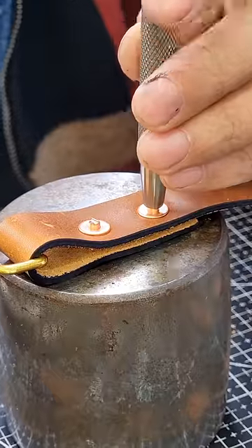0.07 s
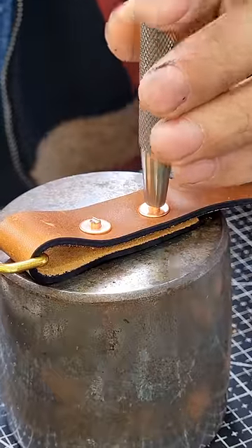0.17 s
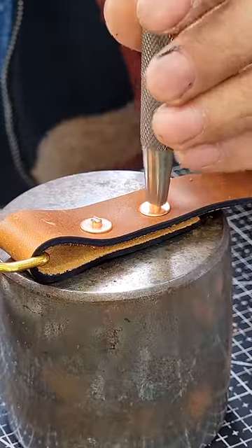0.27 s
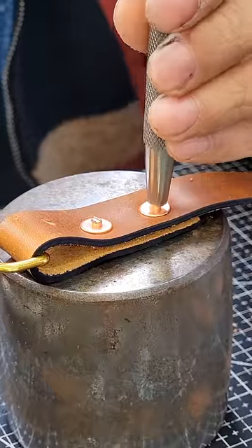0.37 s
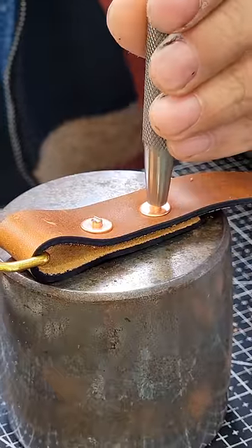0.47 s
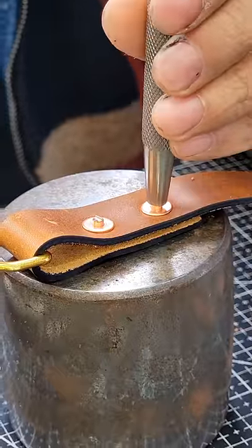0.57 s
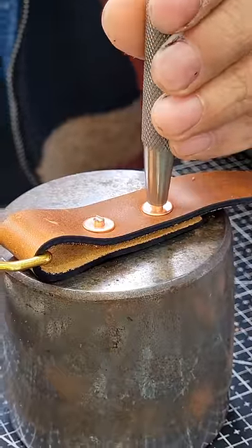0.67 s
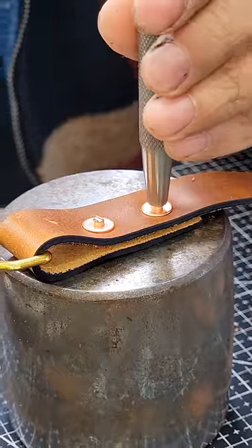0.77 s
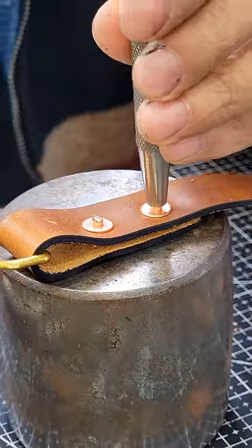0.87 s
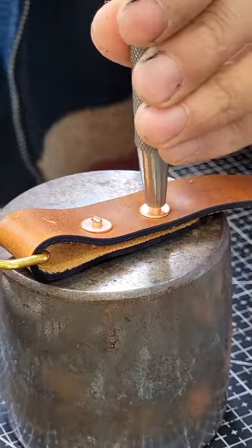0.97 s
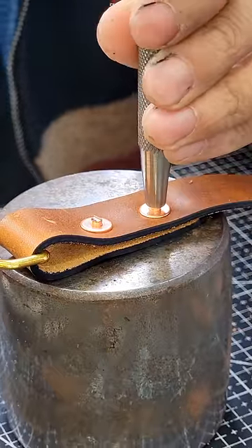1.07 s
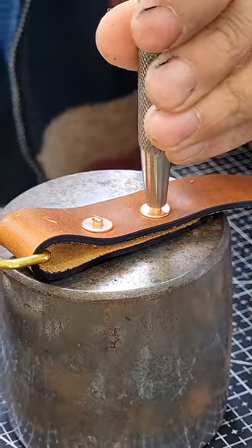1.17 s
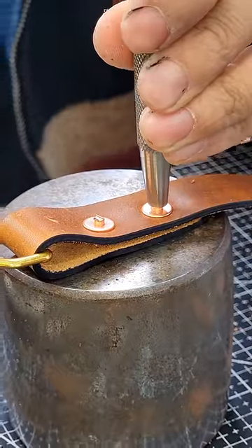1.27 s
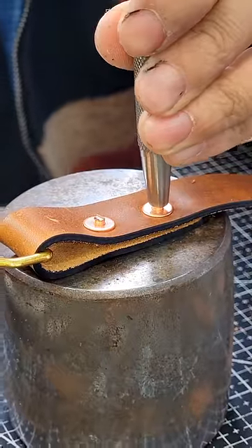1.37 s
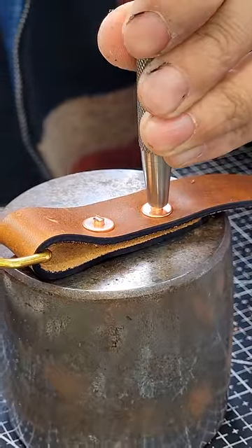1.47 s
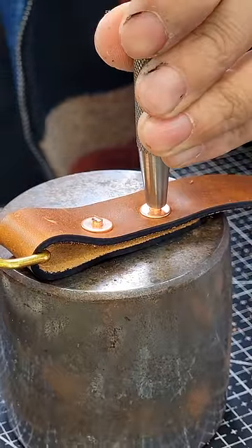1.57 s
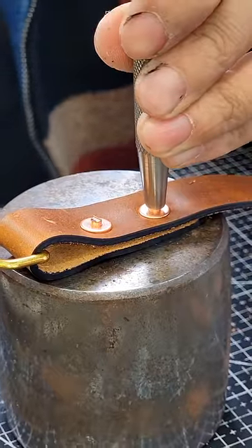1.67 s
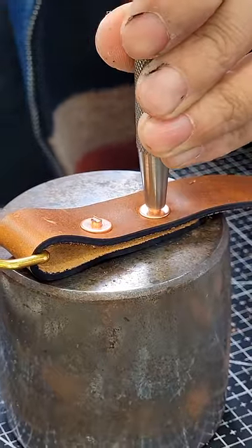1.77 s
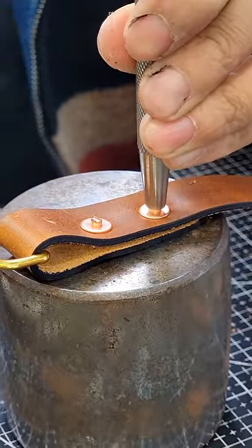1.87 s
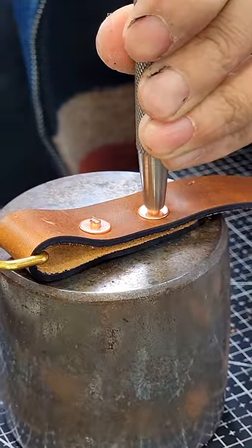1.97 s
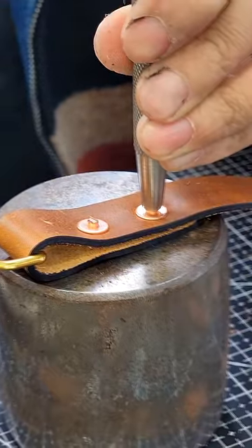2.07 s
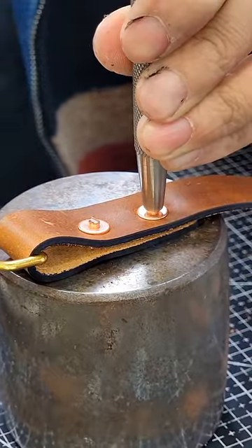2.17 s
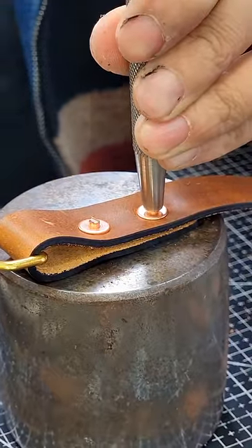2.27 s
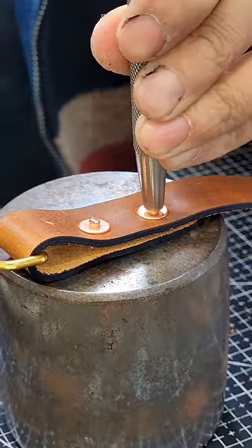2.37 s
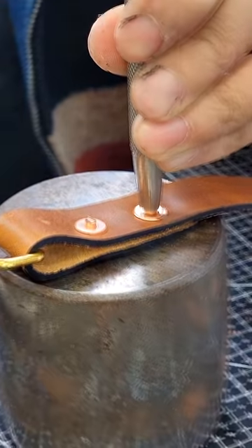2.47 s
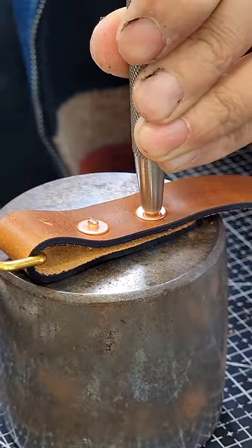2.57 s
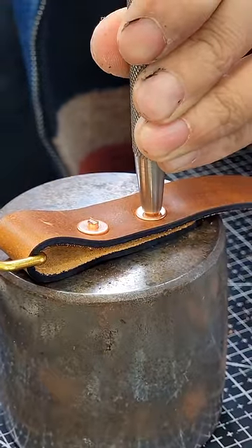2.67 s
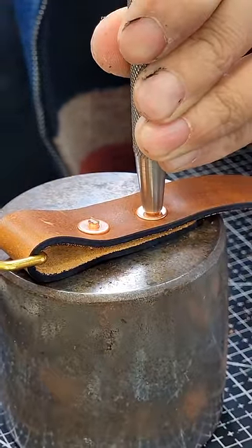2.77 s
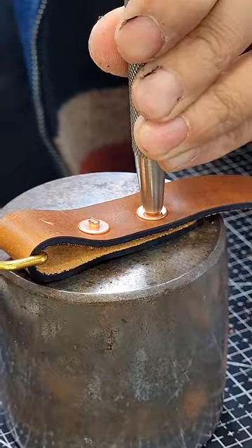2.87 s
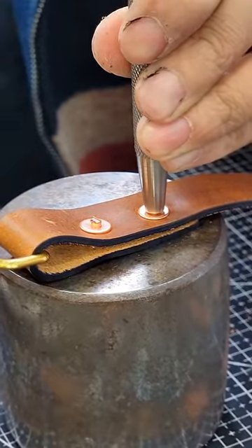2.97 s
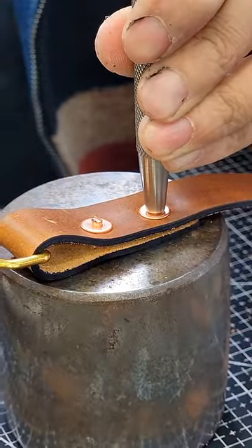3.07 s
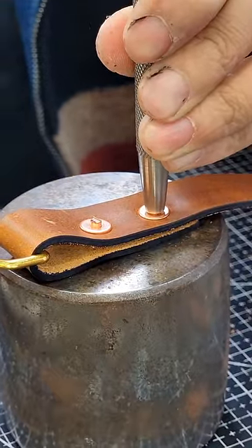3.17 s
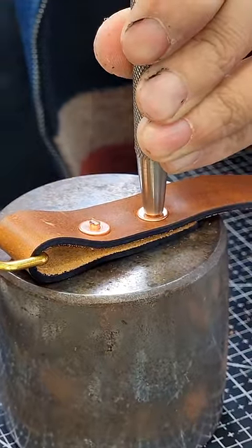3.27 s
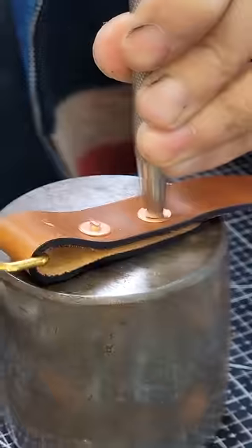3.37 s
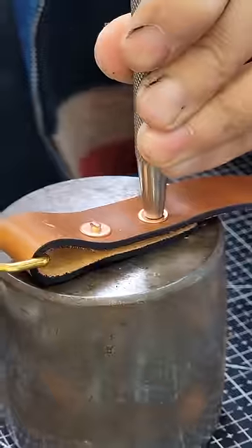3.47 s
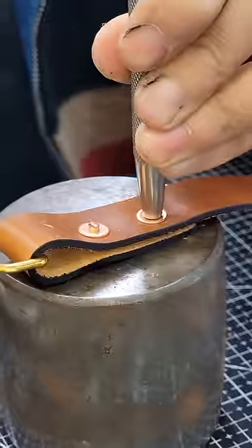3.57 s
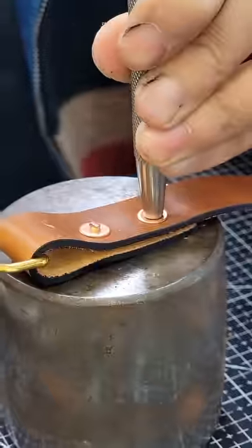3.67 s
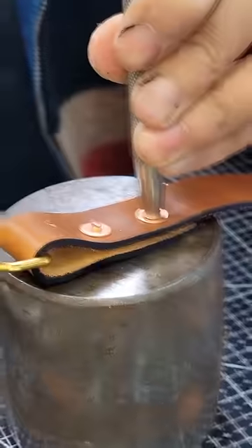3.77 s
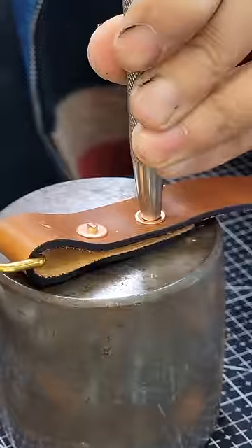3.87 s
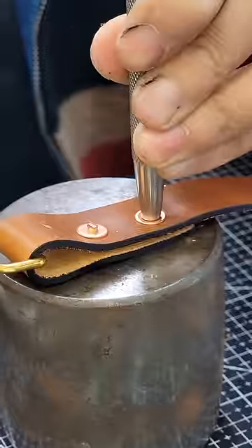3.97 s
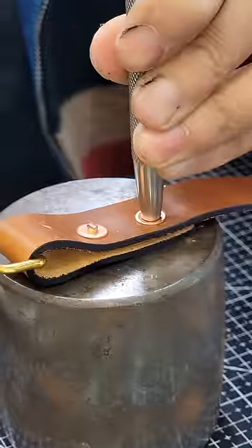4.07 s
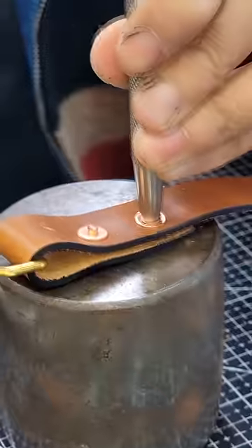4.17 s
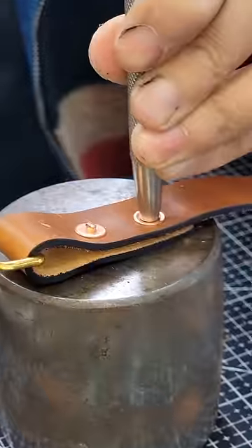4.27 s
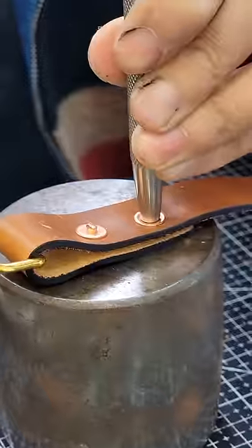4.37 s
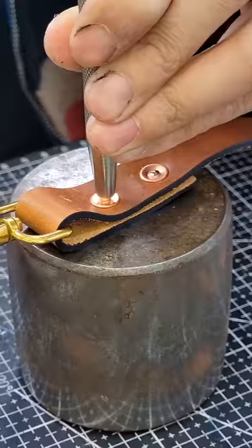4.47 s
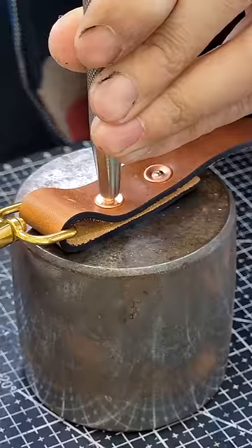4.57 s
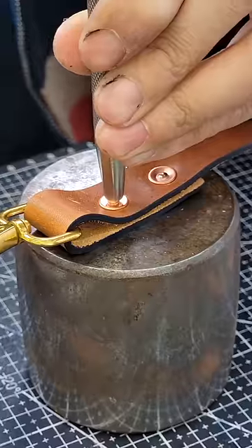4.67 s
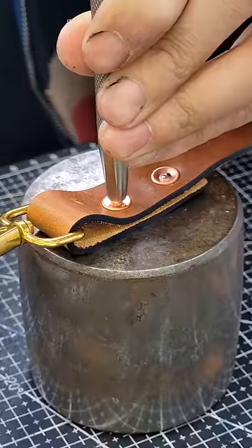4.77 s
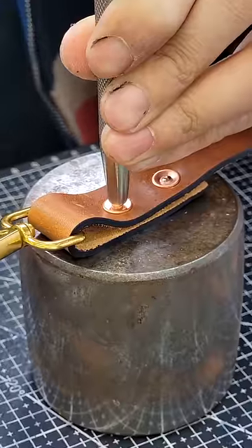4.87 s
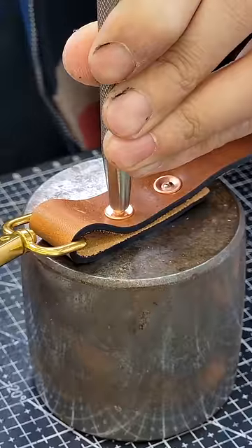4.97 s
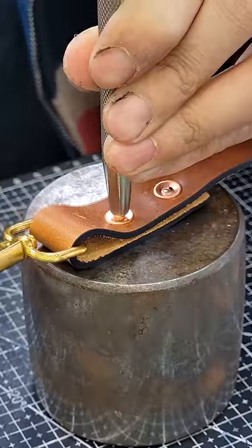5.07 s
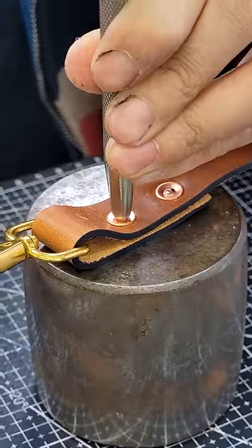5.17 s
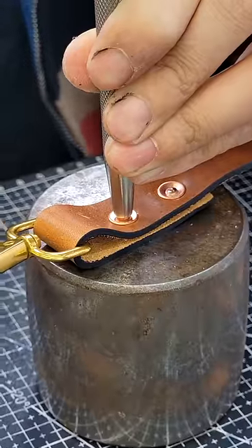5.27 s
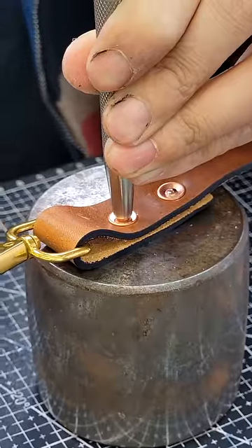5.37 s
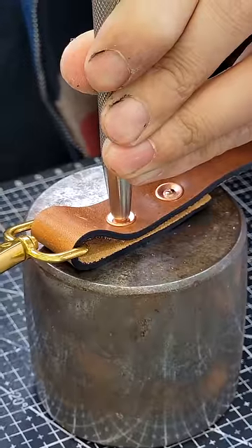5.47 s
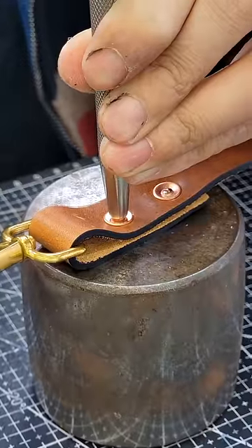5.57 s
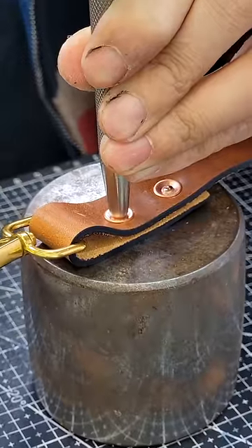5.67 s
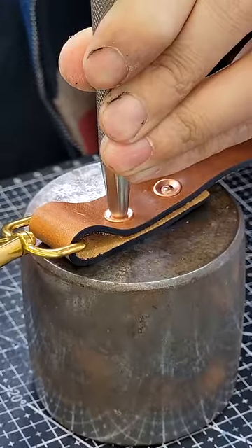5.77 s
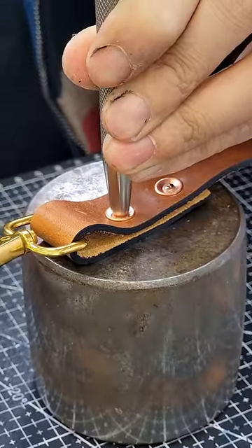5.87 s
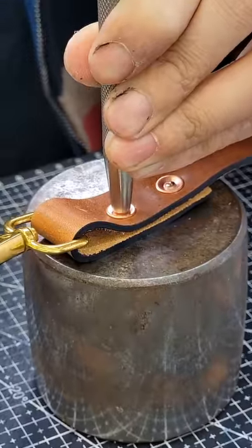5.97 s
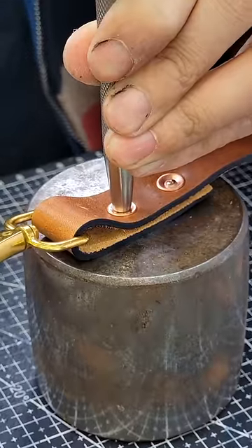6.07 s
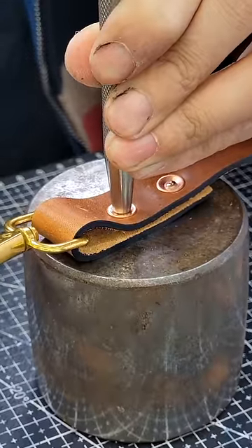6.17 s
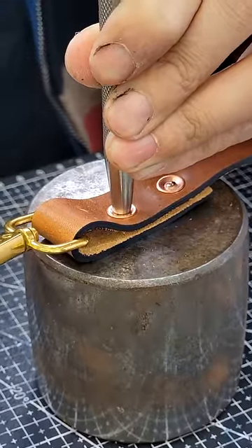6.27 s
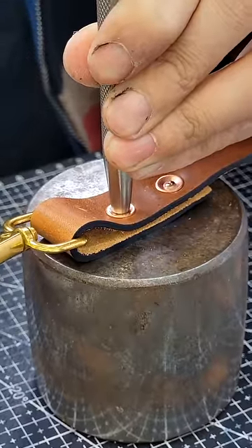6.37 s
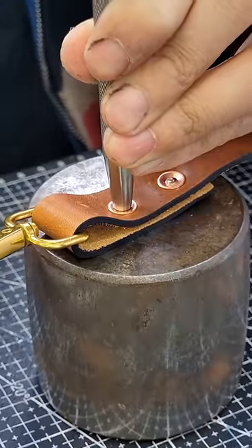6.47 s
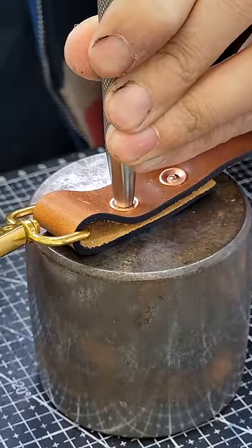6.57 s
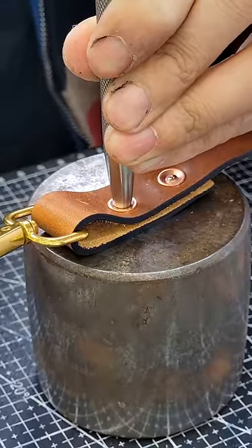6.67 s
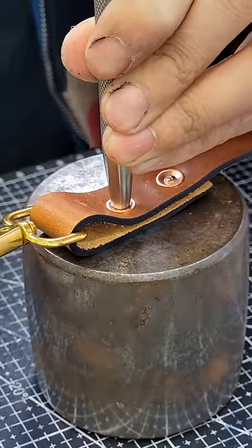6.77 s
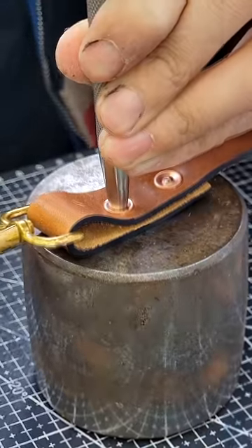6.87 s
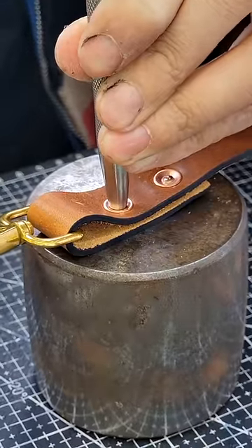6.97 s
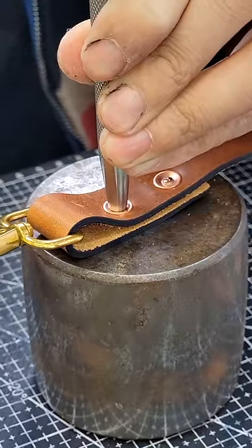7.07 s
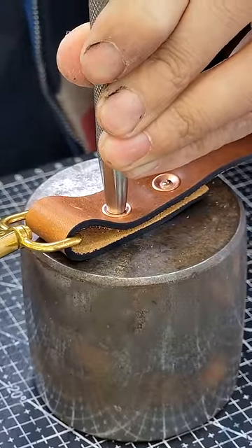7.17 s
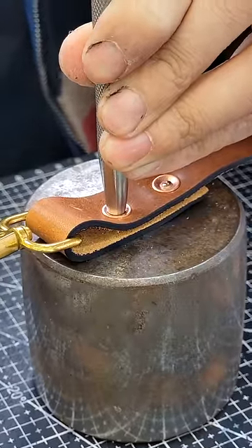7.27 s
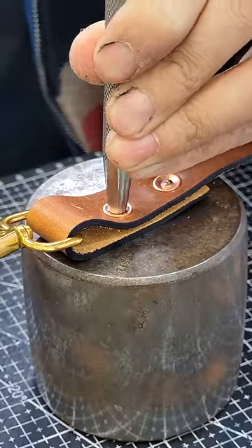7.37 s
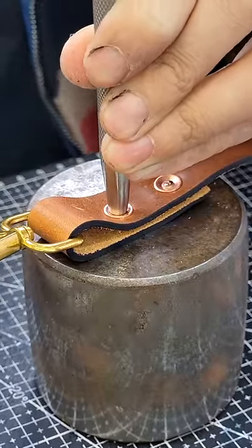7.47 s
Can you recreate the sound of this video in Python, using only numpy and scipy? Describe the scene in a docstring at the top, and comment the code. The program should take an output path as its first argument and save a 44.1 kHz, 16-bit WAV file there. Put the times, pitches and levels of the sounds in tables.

```python
"""A small, quiet workshop: a hammer drives a steel punch onto copper rivets in a leather strap, over a
steel block on the bench. The first blow on each rivet sinks into soft copper with a dull thud and a
bright click; as the copper hardens, later blows land hard and knock the bench. The punch pings when
struck and ticks and squeaks faintly when handled; after one blow the hammer rebounds with light ticks.
The room answers over a low rumble and hiss, and a fast limiter holds the peaks."""
import sys
import numpy as np
from scipy import signal
from scipy.fft import rfft, irfft, next_fast_len
from scipy.io import wavfile
from scipy.ndimage import uniform_filter1d, minimum_filter1d, map_coordinates

SR = 44100
rng = np.random.default_rng(int(sys.argv[2]) if len(sys.argv) > 2 else 0)


def pcm_store(signal):
    """Save signal as 16-bit PCM."""
    levels = np.round(np.clip(np.atleast_2d(signal), -1, 1) * 32767)
    wavfile.write(sys.argv[1], SR, levels.astype(np.int16).T)


N = 331191
LEAD = round(.06 * SR)  # pre-roll before a contact, in samples
T = np.arange(-LEAD, SR) / SR  # time around one contact, s


# hammer blows: t/s, force/dB, click trim/dB, ping f/Hz, ping level/dB
BLOWS = [(1.6991, 0.5, -21.5, 4150, -36), (2.1465, -0.5, -29, 14640, -37), (2.5458, .5, -36.5, 7020, -38),
         (3.0098, 0.04, -43, 9940, -46), (3.4321, -1.56, -45.5, 12340, -47), (3.851, -4, -27, 12050, -35.5),
         (4.295, 0.5, -35.5, 12640, -41.5), (4.7525, -1, -20.5, 7610, -37), (5.183, -.5, -30, 6940, -28),
         (5.684, 0, -48, 7900, -42.5), (6.1144, -.5, -42.5, 8130, -49.5), (6.53, 0, -35.5, 4760, -46.5),
         (6.9702, 0, -30, 4760, -36.5)]
# stereo lean of the blows: f/Hz, left minus right/dB
PAN_CURVE = [(60, -1), (250, -2.5), (550, -0.5), (1100, 0), (2200, 3.5), (4500, 0), (9000, .5),
             (14000, -1.5)]

def hammering(boom_db=-13.5, room_db=-8.5, rattle_db=0.5, renewed=0.78, mute_s=(4.47, 4.72)):
    """Force and the copper's softness share each blow among block, bench and punch; the room answers."""
    out = np.zeros((2, N))
    boom, walls = room(BOOM_EQ), room(WALLS_EQ)
    for s, force_db, click_db, ping_hz, ping_db in BLOWS:
        # soft copper trades knock, thud and brightness for a deep shove
        soft = softness(s)
        knock_db = force_db - 23 - 7.5 * soft ** 3
        thud_db = force_db - 14 - 8 * soft ** 3
        shove_db = force_db - 45 + 36.5 * np.sin(soft * np.pi / 2)
        dull_db = -12.5 * soft - 1.1 * force_db
        corner_hz = 750 - 374 * soft ** 3
        bench = amp(7) * np.array([knock(rise_share=0.89), knock(rise_share=1.0)])
        bench += amp(rattle_db) * rattle()
        # a share of the room's answer is new with each blow
        new_walls = uneven(room(WALLS_EQ), depth_db=2.33, spacing_hz=56.6)
        answer = np.sqrt(1 - renewed) * walls + np.sqrt(renewed) * new_walls
        body = bench + amp(room_db) * answer + lingering_rings()
        add(out, s, amp(knock_db) * cushion(body, dull_db, corner_hz))
        add(out, s, amp(thud_db) * thud())
        add(out, s + 0.0013, amp(shove_db) * shove())
        # thud and shove both stir the room's low boom
        add(out, s, (amp(thud_db + boom_db) + amp(shove_db - 22)) * boom)
        add(out, s, steel(click_db, ping_hz, ping_db, dull_db))
    out = filtered(out, lambda hz: amp(along(PAN_CURVE, hz) * np.array([[.5], [-.5]])))
    # the ringing stops short before the second rivet
    t = np.arange(N) / SR
    muted = (t > mute_s[0]) & (t < mute_s[1])
    return out * uniform_filter1d(1.0 - muted, size=200)


# rivets: start t/s, hardening scale/blows
RIVETS = [(1.5, 1.7), (4.6, .68)]

def softness(s):
    """1 for the first blow on a rivet; every further blow hardens the copper toward 0."""
    begins, hardens = [rivet for rivet in RIVETS if rivet[0] < s][-1]
    taken = sum(begins < blow[0] < s for blow in BLOWS)
    return np.exp(-(taken / hardens) ** 2)


def cushion(x, dull_db, corner_hz):
    """Yielding copper lengthens the contact and dulls the blow: a high shelf one octave wide."""
    return filtered(x, lambda hz: amp(dull_db * np.clip(np.log2((hz + 1) / corner_hz), 0, 1)))


def shove(hz=84, t60=.062, bend_hz=175, bend_t60=0.022, bend_db=-2):
    """Copper gives way and shoves the block down: it bounces on its mat and the bench top bends."""
    age = np.maximum(T, 0)
    bounce = np.sin(2 * np.pi * hz * age) * amp(-60 * age / t60)
    bend = np.sin(2 * np.pi * bend_hz * age) * amp(-60 * age / bend_t60)
    return bounce + amp(bend_db) * bend


def thud(hz=74, t60=0.011, rise=0.044, delay=0.00044):
    """The low heave of the heavy block on the bench."""
    return np.interp(T - delay, T, np.sin(2 * np.pi * hz * T) * swell(rise, t60))


# modes of the bench under the block: f/Hz, level/dB, t60/s
BENCH_MODES = [(278, -4, 0.048), (366, -7.5, 0.055), (422, -12, 0.028), (532, 0, 0.027), (673, -11, 0.047),
               (780, -23, 0.038), (1080, -14, 0.032), (1338, -20, 0.027)]

def knock(rise_share, delay=.0016):
    """An added swell leads into the contact; then the bench modes die fast, different with each blow."""
    detunes = 1 + .018 * rng.standard_normal(len(BENCH_MODES))
    gains = amp(1.8 * rng.standard_normal(len(BENCH_MODES)))
    modes = sum(gain * amp(db) * swell(rise_share * t60, t60) * np.sin(2 * np.pi * hz * detune * T)
                for (hz, db, t60), detune, gain in zip(BENCH_MODES, detunes, gains))
    return np.interp(T - delay, T, modes)


# woody colour of the rattle: f/Hz, level/dB
RATTLE_EQ = [(120, -19.5), (220, -3), (500, 1), (800, -13.5), (1300, -15.5), (2000, -26), (4000, -60)]

def rattle():
    """The bench's many lesser modes roughen the knock."""
    return noise(RATTLE_EQ) * np.array([swell(.036, .055), swell(.046, .055)])


# long rings of the bench and the things on it: f/Hz, level/dB, t60/s
LONG_RINGS = [(51.6, -13, 0.55), (77.8, -22, 1.3), (103.2, -22.5, 0.79), (171, -33.5, 1.3),
              (596, -30.5, .35), (1011, -22, 0.31), (1396, -47.5, 0.81), (1857, -53, 0.87),
              (2830, -39, 0.29)]

def lingering_rings():
    """The shaken bench leaves a faint tonal tail after the blow."""
    rings = sum(amp(db + rng.normal(0, 1)) * swell(0.0038, t60)
                * np.sin(2 * np.pi * (hz * T + rng.random())) for hz, db, t60 in LONG_RINGS)
    return rings * np.clip((T[-1] - T) * 2, 0, 1)


# modes of punch and hammer head, stirred by every blow: f/Hz, level/dB re the ping
PUNCH_MODES = [(4900, -9), (7120, -12.5), (12150, -10), (14650, -7.5)]
# bright colour of the sizzle: f/Hz, level/dB
SIZZLE_EQ = [(500, -31.5), (1500, 1.5), (2600, 4), (4500, -3), (6000, -7), (7300, 3), (9000, -4),
             (12000, 0), (15000, -0.5), (16500, -8.5)]

def steel(click_db, ping_hz, ping_db, dull_db):
    """Hammer on punch: a click, pings and a bright sizzle that lasts longer on hardened copper."""
    t60 = .165 * np.exp(0.018 * dull_db)
    sizzle = noise(SIZZLE_EQ) * np.array([swell(0.01, t60), swell(0.047, t60)])
    sizzle_db = -26 + 0.36 * ping_db
    metal = amp(click_db + 5.5) * click(click_db) + amp(sizzle_db) * sizzle
    rings = ping(ping_hz) + sum(amp(db + rng.normal(0, 2)) * ping(hz) for hz, db in PUNCH_MODES)
    return uneven(metal, depth_db=2.8, spacing_hz=260) + amp(ping_db) * rings


# colour of the click: f/Hz, level/dB
CLICK_EQ = [(500, -23), (1500, -10.5), (2700, 1), (4500, -4), (7000, -4), (9500, -1), (15000, -2)]

def click(click_db, usual_db=-33.5):
    """Steel meets steel in a tight crack; the weaker the click, the thinner it sounds."""
    crack = noise(CLICK_EQ) * swell(0.0085, 0.0077)
    treble_db = 0.82 * (usual_db - click_db)
    return filtered(crack, lambda hz: amp(treble_db * along([(5000, 0), (10000, 1)], hz)))


def ping(ring_hz, rise=0.039, t60=0.034):
    """Punch and hammer head ring, choked by the hands; where the hammer lands decides the pitch."""
    width_hz = 110 * np.sqrt(ring_hz / 5000)
    white = rng.standard_normal((2, len(T)))
    ring = filtered(white, lambda hz: 1 / (1 + ((hz - ring_hz) / width_hz) ** 2))
    return unit(ring) * swell(rise, t60)


# colours of the room's low boom and its wall reflections: f/Hz, level/dB
BOOM_EQ = [(20, -15.5), (36, -7), (52, 0), (68, -4.5), (90, 0), (135, -6), (175, 0), (240, -10), (330, -23),
           (600, -72.5)]
WALLS_EQ = [(150, -28.5), (260, 2), (520, -0.5), (700, -2.5), (1000, -5), (1500, -17), (2100, -25.5),
            (2730, -24.5), (2850, -16.5), (2980, -26.5), (4500, -32), (7500, -35.5), (9000, -46),
            (16000, -37)]
# early reverb decay: f/Hz, t60/s
ROOM_DECAY = [(60, .55), (150, 0.23), (400, 0.52), (1000, 0.3), (3000, 0.63), (8000, .54), (16000, .38)]

def room(spectrum, fade_db_per_s2=150):
    """A diffuse answer in which each frequency dies at its own speed, faster toward the end."""
    hz, t, bands = signal.stft(noise(spectrum), SR, nperseg=512)
    age = np.maximum(t - LEAD / SR, 0)
    fade = amp(-60 * age / along(ROOM_DECAY, hz)[:, None] - fade_db_per_s2 * age ** 2)
    tail = signal.istft(bands * fade, SR, nperseg=512)[1][:, :len(T)]
    return tail * np.clip(T / 0.025, 0, 1)


# light contacts of punch or rebounding hammer: t/s, level/dB, f/Hz, t60/s, scrape/dB re the tick
LIGHT_TICKS = [(0.469, -63, 2840, 0.016, -11), (1.079, -73, 2930, 0.032, -3), (1.174, -72, 584, 0.28, 8),
               (1.237, -58.5, 585, 0.11, -3), (1.971, -59, 3030, 0.032, -14.5),
               (3.901, -40.5, 1390, .025, -5), (4.037, -62, 1870, 0.025, -0.5)]
# colour of the scrape: f/Hz, level/dB
SCRAPE_EQ = [(300, -11), (600, -6.5), (1100, -15), (3200, -12.5), (9000, -25.5), (16000, -27)]

def ticks():
    """Light ticks and scrapes: the punch is seated, and the hammer rebounds after one blow."""
    out = np.zeros((2, N))
    for s, db, hz, t60, scrape_db in LIGHT_TICKS:
        tick = np.sin(2 * np.pi * hz * T) + amp(scrape_db) * noise(SCRAPE_EQ)
        add(out, s, amp(db) * swell(t60 / 4, t60) * tick)
    return out


# falling squeaks: t/s, length/s, start f/Hz, end f/Hz, level/dB
LEATHER_SQUEAKS = [(1.2, .33, 3690, 2365, -78), (1.793, 0.12, 4700, 4130, -77)]

def squeaks(width_hz=420):
    """Thin, fuzzy tones swell and slide down as the punch is shifted on the leather."""
    out = np.zeros((2, N))
    for s, length, start_hz, end_hz, db in LEATHER_SQUEAKS:
        progress = np.clip(T / length, 0, 1)
        phase = 2 * np.pi * np.cumsum(start_hz * (end_hz / start_hz) ** progress) / SR
        fuzz = filtered(rng.standard_normal((2, len(T))), lambda hz: 1 / (1 + (hz / width_hz) ** 2))
        arch = np.sqrt(np.abs(np.sin(np.pi * progress)))
        add(out, s, amp(db) * arch * unit(fuzz * np.sin(phase)))
    return out


# colours of the rumble and the hiss: f/Hz, level/dB
RUMBLE_EQ = [(20, -5), (32, -4.5), (53, -2), (90, -2), (130, -11.5), (240, -11), (400, -19), (750, -25.5),
             (1300, -34.5), (2500, -60)]
HISS_EQ = [(600, -10.5), (1400, 1.5), (2200, 3), (3000, 4.5), (4500, -2), (7300, -3), (9000, -11.5),
           (16000, -8.5)]
# fader ride on the hiss: t/s, level/dB before the trim
HISS_RIDE = [(0.0, -86), (1.92, -83), (2.98, -93.5), (3.93, -89), (7.5, -94.5)]

def room_tone(rumble_db=-68, hiss_trim_db=2.5):
    """The workshop's steady low rumble and a faint hiss that sinks once the hammering begins."""
    hiss_db = hiss_trim_db + np.interp(np.arange(N) / SR, *np.transpose(HISS_RIDE))
    return amp(rumble_db) * noise(RUMBLE_EQ, size=N) + amp(hiss_db) * noise(HISS_EQ, size=N)


# stereo image of the noise: f/Hz, left-right correlation
CORRELATION = [(100, 0.82), (300, 0.88), (700, 0.38), (1300, 0), (2500, 0.0098)]

def noise(spectrum, size=len(T)):
    """Coloured stereo noise of rms 1, narrow in the bass and wide in the treble."""
    def mid_side_gains(hz):
        angle = np.arccos(np.clip(along(CORRELATION, hz), -1, 1)) / 2
        return amp(along(spectrum, hz)) * [np.cos(angle), np.sin(angle)]
    mid, side = filtered(rng.standard_normal((2, size)), mid_side_gains)
    return unit(np.array([mid + side, mid - side]))


def uneven(x, depth_db, spacing_hz):
    """Each blow stirs the lesser modes at new strengths: random peaks and dips across frequency."""
    knots = rng.standard_normal(SR // 20)
    ripple = lambda hz: map_coordinates(knots, [hz / spacing_hz], mode="mirror")
    return filtered(x, lambda hz: amp(depth_db * ripple(hz)))


def swell(rise, t60):
    """Climbs 60 dB in `rise` seconds up to the contact, an added effect, then dies away."""
    return amp(-60 * np.maximum(-T / rise, T / t60))


def add(track, s, sound):
    """Mixes in a sound whose contact falls at s seconds."""
    start = round(s * SR) - LEAD
    part = sound[..., :N - start]
    track[:, start:start + part.shape[-1]] += part


def filtered(x, response):
    """Zero-phase EQ with gain response(hz)."""
    size = x.shape[-1]
    padded = next_fast_len(size + SR // 10)
    return irfft(rfft(x, padded) * response(np.fft.rfftfreq(padded, 1 / SR)), padded)[..., :size]


def along(points, hz):
    """Reads a curve of (f/Hz, value) points on a log axis."""
    freqs, values = np.transpose(points)
    return np.interp(np.log(hz + 1), np.log(freqs + 1), values)


def amp(db):
    """Decibels to gain."""
    return 10 ** (np.asarray(db) / 20)


def unit(x):
    """Scaled to rms 1."""
    return x / np.sqrt(np.mean(x ** 2) + 1e-20)


def scene():
    """The work at the bench in the quiet workshop."""
    return hammering() + ticks() + squeaks() + room_tone()


def record(dry, ceiling_db=-9.3, top_hz=16000):
    """A fast look-ahead limiter holds the peaks; a steep low-pass trims the top."""
    needed = np.minimum(1, amp(ceiling_db) / (np.abs(dry).max(0) + 1e-9))
    gain = uniform_filter1d(minimum_filter1d(needed, size=45), size=45)
    return filtered(dry * gain, lambda hz: 1 / (1 + (hz / top_hz) ** 120))


dry = scene()
out = record(dry)
pcm_store(out)
```